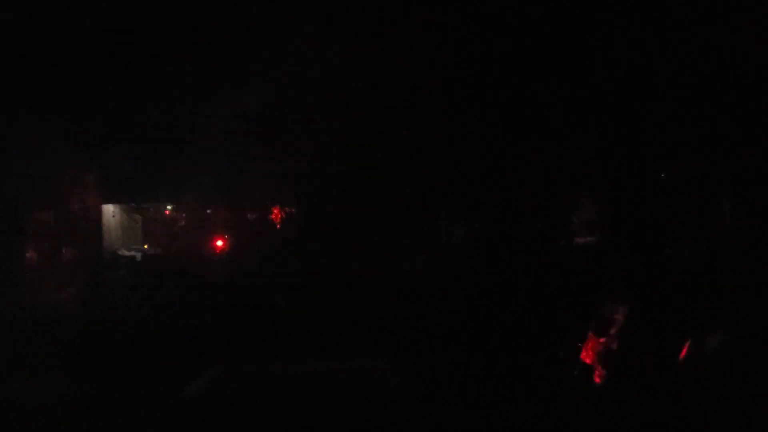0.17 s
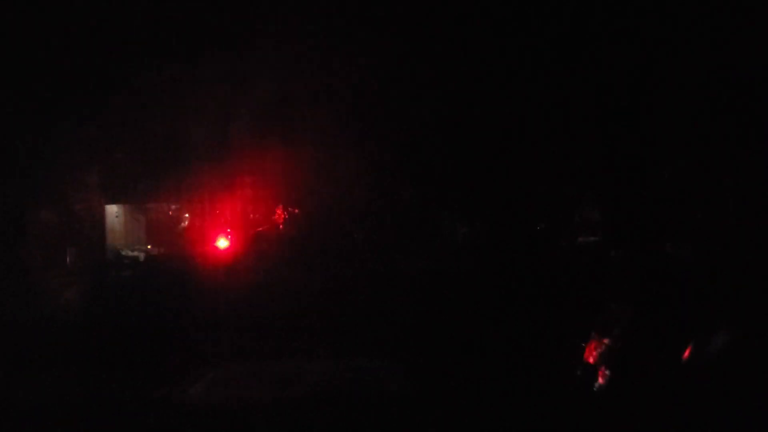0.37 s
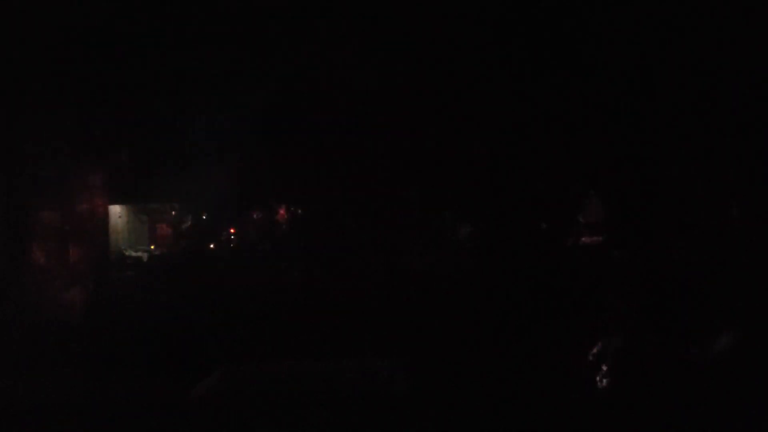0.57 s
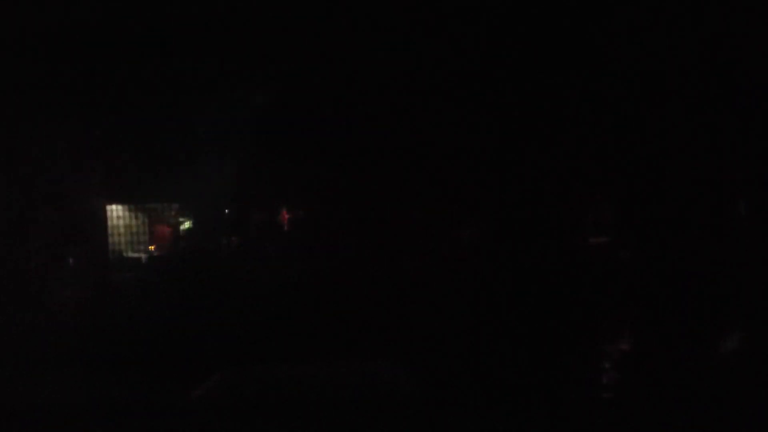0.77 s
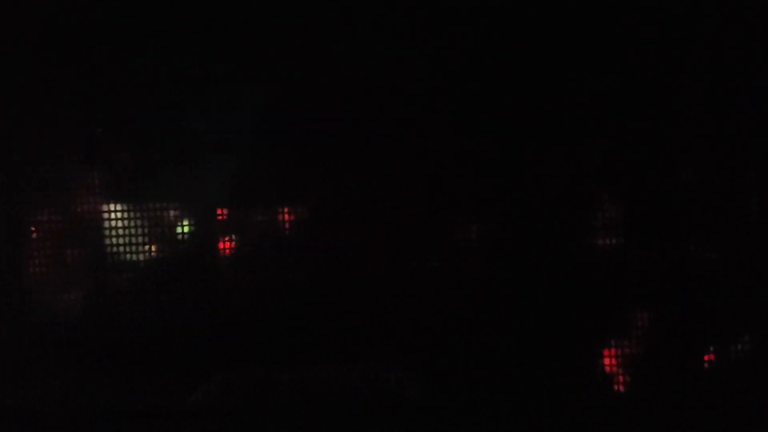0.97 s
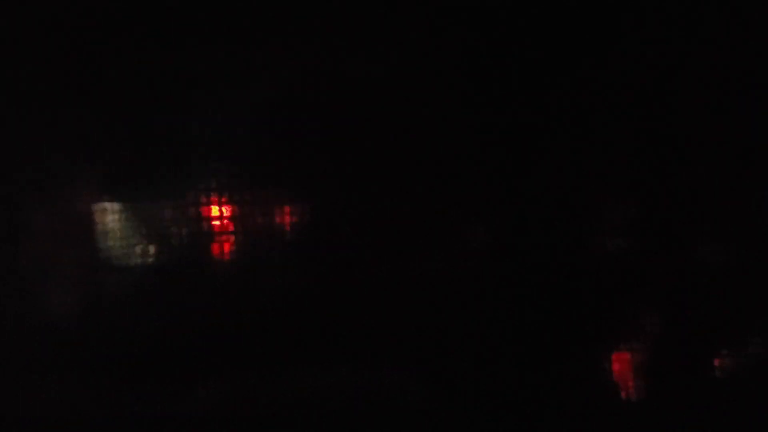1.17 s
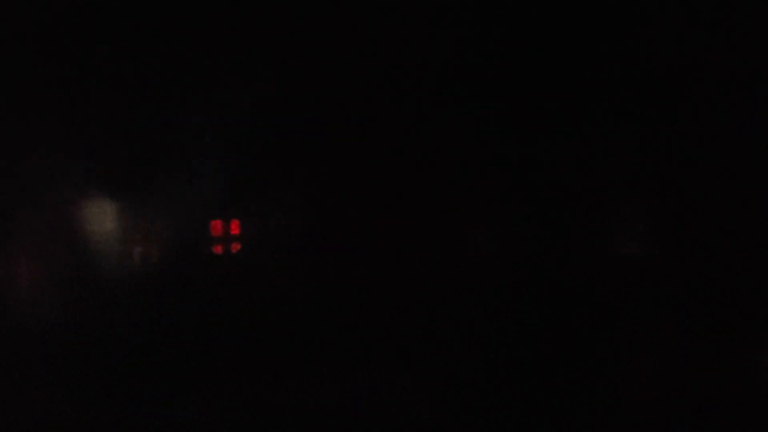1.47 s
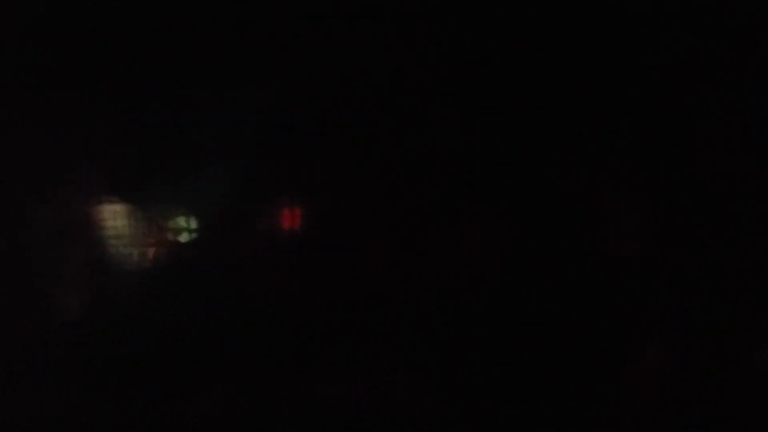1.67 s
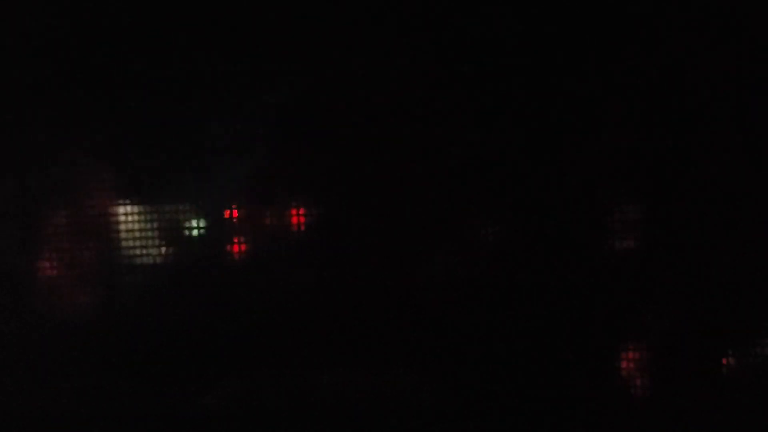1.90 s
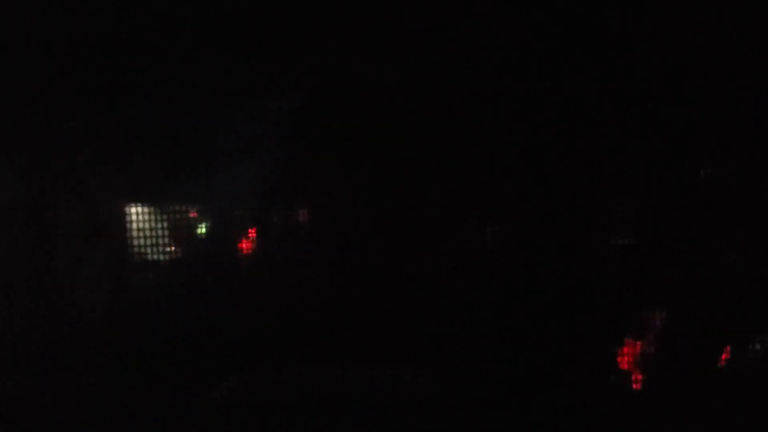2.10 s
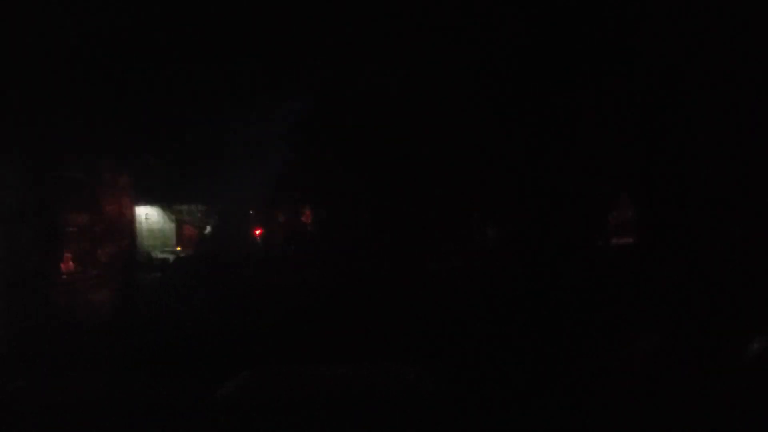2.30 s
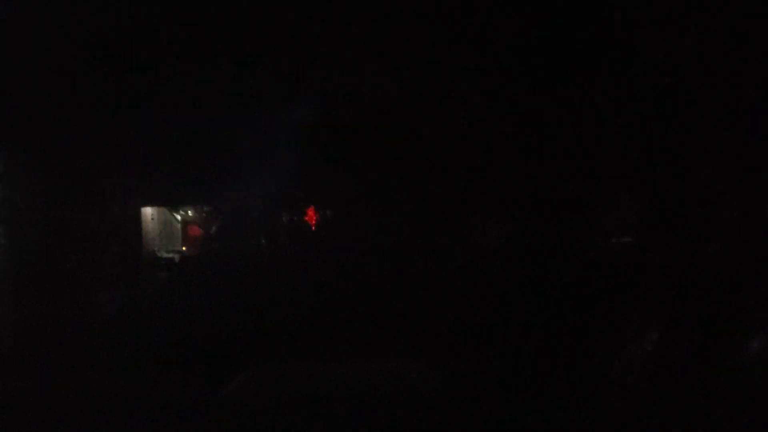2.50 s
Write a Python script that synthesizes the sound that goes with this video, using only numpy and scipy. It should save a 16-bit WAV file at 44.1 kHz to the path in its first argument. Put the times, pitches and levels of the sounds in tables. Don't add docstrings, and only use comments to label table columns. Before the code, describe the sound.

Steady bassy wind with small gusts, a soft electrical hum and very faint high insect shimmer on the left; late on, a catch close to the stereo microphones snaps twice, dry and sharp, followed by a faint tick.

```python
import sys
import numpy as np
from scipy import signal
from scipy.io import wavfile
from scipy.ndimage import uniform_filter1d

SR = 44100
rng = np.random.default_rng(int(sys.argv[2]) if len(sys.argv) > 2 else 0)


def field_ratio(decibels):
    return 10 ** (np.asarray(decibels, dtype=float) / 20)


def log_audio(samples):
    frames = np.atleast_2d(samples).T
    limited = np.clip(frames, -1, 1)
    pcm = np.round(limited * 32767).astype(np.int16)
    wavfile.write(sys.argv[1], SR, pcm)


N = 116865

# t/s, level/dB
GUSTS = [(0, -39), (.4, -43), (.75, -42), (1.05, -40), (1.4, -44), (1.6, -41), (1.85, -44), (2.0, -39),
         (2.17, -46), (2.4, -39), (2.65, -42.5)]
# f/Hz, density/dB
RUMBLE_SPECTRUM = [(24, -48), (30, -8), (37, -3.5), (110, -0.5), (140, -2.5), (160, -9), (230, -15.5),
                   (500, -87)]
# f/Hz, density/dB
ROAR_SPECTRUM = [(150, -13), (260, 1), (365, -5), (420, -10.5), (600, -16), (1200, -22), (2500, -28.5),
                 (5500, -39.5)]
# t/s, f/Hz, level/dB
MOAN = [
    (1.9, 1018, -90),
    (1.925, 980, -67.5),
    (2.03, 860, -67.5),
    (2.07, 846, -78),
    (2.11, 896, -67),
    (2.19, 908, -86),
    (2.23, 900, -90),
]
# f/Hz, likeness/1
COHERENCE = [(30, .95), (100, 0.86), (250, 1), (370, 0.61), (700, 0.52), (1200, 0.017)]
# f/Hz, phase/rad
LEFT_LEAD = [(30, 0.11), (120, 0.14), (240, 0.31), (700, 0.52)]
# f/Hz, level/dB
LEFT_EXCESS = [(50, 1.5), (270, 5), (450, 6.5), (1200, 6.5), (3300, 7)]
# t/s, level/dB
SNAPS = [
    (2.3026, 0),
    (2.4432, -2.2),
]
# f/Hz, level/dB, T60/s
HOUSING_LEFT = [(315.3, -15, 0.031), (760, -15, 0.022), (1077, -22, 0.033), (1330, -18.5, 0.017),
                (1774, -13, .011), (2540, -26.5, 0.0057), (3350, -18.5, 0.0058), (3865, -21, 0.0071),
                (4820, -38, 0.012), (6320, -35, 0.0084)]
# f/Hz, level/dB, T60/s
HOUSING_RIGHT = [(306.3, -10.5, 0.024), (465, -7, 0.0052), (744, -16.5, 0.013), (1085, -15, 0.0046),
                 (2285, -26, 0.013), (3160, -22, 0.004), (3880, -22, .0035), (5800, -53, 0.0055)]
# f/Hz, level/dB, T60/s
HOUSING_HIGH = [(10600, -54, 0.0035), (14900, -36.5, .003)]
# t/s, level/dB, left lag/s, body level/dB
TICKS = [
    (1.5051, -40, .0005, -2),
    (2.642, -58.5, 0.00046, 15.5),
]
# f/Hz, level/dB, T60/s
TICK_MODES = [(910, -2, 0.01), (1940, -9, 0.0074), (3130, -7, 0.0055), (4300, -13, .003),
              (5470, -7.5, 0.0033), (6800, 0, 0.0027), (8700, -8, 0.0016), (11100, -4, .002)]
# f/Hz, T60/s
ROOM_T60 = [(400, 0.28), (1000, 0.41), (3000, 0.26), (6000, 0.26)]
# f/Hz, level/dB
ROOM_SPECTRUM = [(200, -2), (400, 6), (900, -9), (1800, -13), (4000, -18.5), (5500, -25.5), (8000, -36)]
# t/s, level/dB
CHORUS_SWELL = [(0.0, -74.5), (0.8, -82), (1.53, -77.5), (1.9, -82), (2.14, -79.5), (2.34, -77),
                (2.65, -79)]
CHORUS_BANDS = [6250, 6510, 6830]
# f/Hz, level/dB, left over right/dB
HUM_PARTIALS = [(240.2, -49.5, 3.5), (356, -69.5, 8)]
# f/Hz, density/dB
HISS_SPECTRUM = [(300, -18), (4000, -10), (7000, -17), (8500, -24.5), (11000, -7), (13500, -5),
                 (15300, -0.5)]

TIME = np.arange(N) / SR


def evened(x):
    return x / np.sqrt(np.mean(x ** 2) + 1e-20)


def read(points, hz):
    f, value = np.transpose(points)
    return np.interp(np.log(hz + 1), np.log(f + 1), value)


def curve(rows, column, t):
    rows = np.array(rows, float)
    return np.interp(t, rows[:, 0], rows[:, column])


def add(mix, s, sound):
    part = mix[round(s * SR):][:len(sound)]
    part += sound[:len(part)]


def slow(top_hz):
    t = np.arange(0, N + 256, 256) / SR
    wander = 0
    for f in top_hz * np.geomspace(.1, 1, num=16):
        wander = wander + np.sin(2 * np.pi * (f * t + rng.random())) / np.sqrt(f)
    return np.interp(TIME, t, evened(wander))


def noise(spectrum, patchy_db, size, paired=True):
    frames, hz = 4 * N // size + 5, np.fft.rfftfreq(size, 1 / SR)
    a, b, c, d, patches = rng.standard_normal((frames, len(hz), 5)).T
    patches = uniform_filter1d(patches, size=9, axis=0)
    patches = evened(uniform_filter1d(patches, size=9, axis=1))
    same = paired * np.clip(read(COHERENCE, hz), -1, 1)[:, None]
    left = a + 1j * b
    shared = same * left * np.exp(-1j * read(LEFT_LEAD, hz))[:, None]
    right = shared + np.sqrt(1 - same ** 2) * (c + 1j * d)
    lean = paired * read(LEFT_EXCESS, hz)[:, None] / 2
    z = np.array([left * field_ratio(lean), right * field_ratio(-lean)])
    z = z * field_ratio(read(spectrum, hz)[:, None] + patchy_db * patches)
    return evened(signal.istft(z, nperseg=size, noverlap=size * 3 // 4)[1][:, :N])


def whistle(hz, width, channels):
    r = np.exp(-np.pi * width / SR)
    z = rng.standard_normal((channels, N)) + 1j * rng.standard_normal((channels, N))
    z = signal.lfilter([1], [1, -2 * r, r * r], z)
    return evened((z * np.exp(2j * np.pi * np.cumsum(hz * np.ones(N)) / SR)).real)


def ring(modes, bend_hz=(0, 0)):
    t = np.arange(2600) / SR
    out = np.zeros(len(t))
    for hz, db, t60 in modes:
        sign = -1 if bend_hz[0] < hz < bend_hz[1] else 1
        out += sign * field_ratio(db - 60 * t / t60) * np.sin(2 * np.pi * hz * t)
    return out


def gale():
    gust_db = curve(GUSTS, 1, TIME)
    buffet_db = 1 * slow(20)
    rumble = field_ratio(gust_db + 2.5 + buffet_db) * noise(RUMBLE_SPECTRUM, patchy_db=0.0, size=4096)
    roar_db, roar_follow = -55.5, 0.14
    roar_level = field_ratio(roar_db + roar_follow * (gust_db - gust_db.mean()))
    return rumble + roar_level * noise(ROAR_SPECTRUM, patchy_db=1.5, size=2048)


def moan():
    silent = (TIME < MOAN[0][0]) | (TIME > MOAN[-1][0])
    level = field_ratio(curve(MOAN, 2, TIME) - 200 * silent)
    tone = level * whistle(curve(MOAN, 1, TIME), width=18, channels=1)
    return tone * field_ratio(np.array([[3.0], [-3.0]]))


def snaps():
    out, blow = np.zeros((2, N)), np.hanning(9)
    blow = blow / blow.sum()
    left = np.convolve(-ring(HOUSING_LEFT, (400, 1250)), blow)
    right = np.convolve(ring(HOUSING_RIGHT, (400, 2000)), blow)
    high = ring(HOUSING_HIGH)
    left_lag_s = .00042
    for s, db in SNAPS:
        add(out[0], s + left_lag_s, field_ratio(db) * (left[:len(high)] + high))
        add(out[1], s, field_ratio(db) * (right[:len(high)] + field_ratio(-3.0) * high))
    return out


def ticks():
    out = np.zeros((2, N))
    for s, db, lag, body_db in TICKS:
        low, bright = field_ratio(body_db) * ring(TICK_MODES[:2]), ring(TICK_MODES[2:])
        add(out[0], s + lag, -field_ratio(db) * bright)
        add(out[0], s + 2 * lag, field_ratio(db) * low)
        add(out[1], s, field_ratio(db) * (low + field_ratio(-9.0) * bright))
    return out


def room():
    out = np.zeros((2, N))
    room_db, swell_s, grain = -26.5, 0.024, 2.5
    first_tick = (TICKS[0][0], -12.5)
    for s, db in [*SNAPS, first_tick]:
        hz, t, z = signal.stft(rng.standard_normal((2, SR // 2)), SR, nperseg=256)
        grain_db = grain * rng.standard_normal(len(t))
        decay_db = 60 * t / read(ROOM_T60, hz)[:, None]
        level_db = grain_db + read(ROOM_SPECTRUM, hz)[:, None] - decay_db
        tail = signal.istft(z * field_ratio(level_db), SR, nperseg=256)[1]
        swell = np.minimum(np.arange(tail.shape[1]) / SR / swell_s, 1) ** 2
        tail = field_ratio(room_db + db) * tail * swell
        add(out[0], s, field_ratio(-0.5) * tail[0])
        add(out[1], s, field_ratio(-6.0) * tail[1])
    return out


def hum():
    out = np.zeros((2, N))
    waver_db, waver_hz = 2.22, 5
    for hz, db, left_db in HUM_PARTIALS:
        turn = 2 * np.pi * (hz * TIME + rng.random())
        level = np.sqrt(2) * field_ratio(db + waver_db * slow(waver_hz))
        left = field_ratio(left_db / 2) * np.sin(turn)
        right = field_ratio(-left_db / 2) * np.sin(turn - read(LEFT_LEAD, hz))
        out += level * np.array([left, right])
    return out


def insects():
    band = evened(sum(whistle(hz, width=320, channels=2) for hz in CHORUS_BANDS))
    chorus_db, left_over_right_db = 7, 27
    return band * field_ratio(curve(CHORUS_SWELL, 1, TIME) + chorus_db - np.array([[0], [left_over_right_db]]))


def hiss():
    return field_ratio(-61.5) * noise(HISS_SPECTRUM, patchy_db=-0.3, size=1024, paired=False)


def scene():
    return gale() + moan() + snaps() + ticks() + room() + hum() + insects()


def top_cut(x):
    return signal.sosfilt(signal.butter(12, 16800, fs=SR, output="sos"), x)


def record(dry):
    x = dry + hiss()
    low_pass = signal.firwin(511, 15780, window=("kaiser", 9), fs=SR)
    x = signal.oaconvolve(x, low_pass[None], "same")
    x = signal.sosfilt(signal.butter(3, 30, "high", fs=SR, output="sos"), x)
    return top_cut(x)


dry = scene()
out = record(dry)
log_audio(out)
```